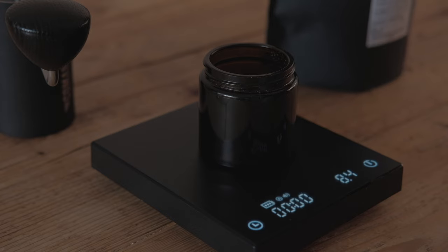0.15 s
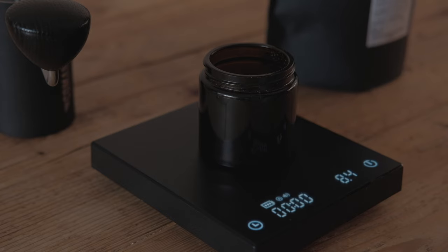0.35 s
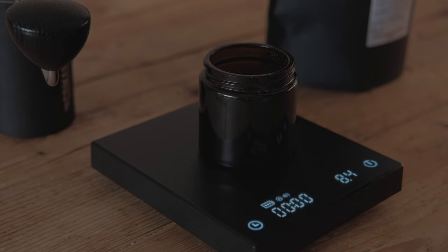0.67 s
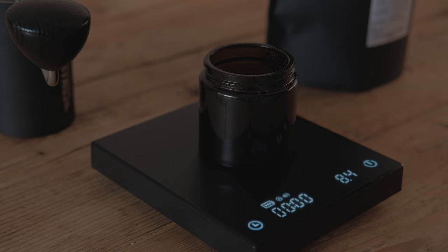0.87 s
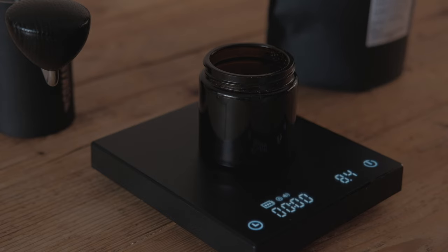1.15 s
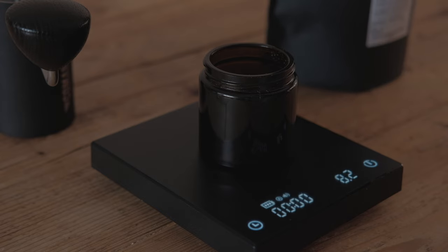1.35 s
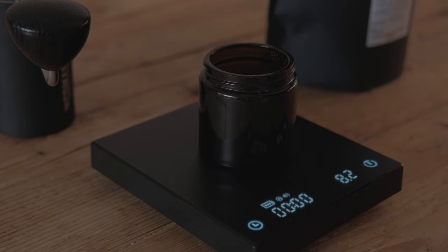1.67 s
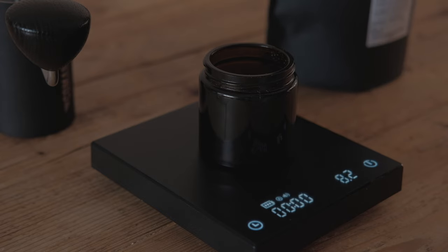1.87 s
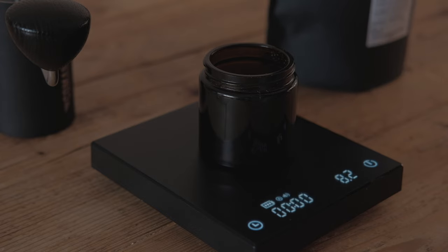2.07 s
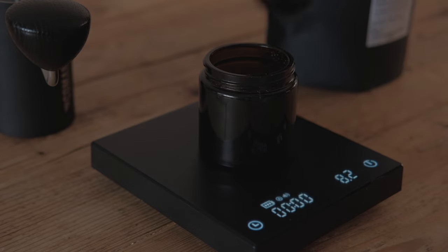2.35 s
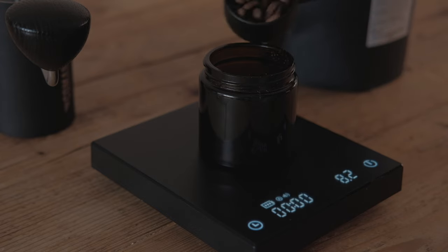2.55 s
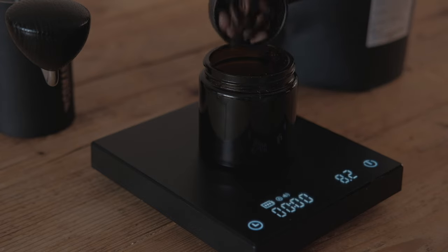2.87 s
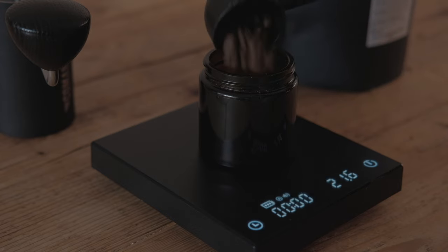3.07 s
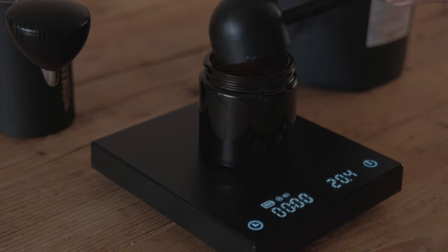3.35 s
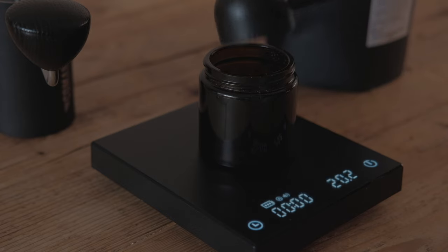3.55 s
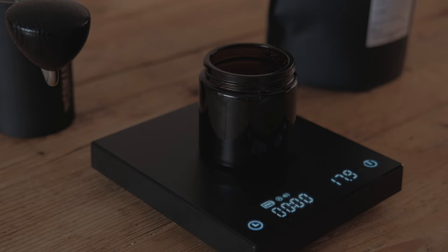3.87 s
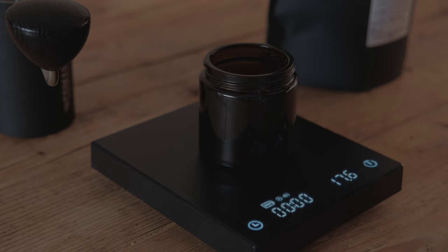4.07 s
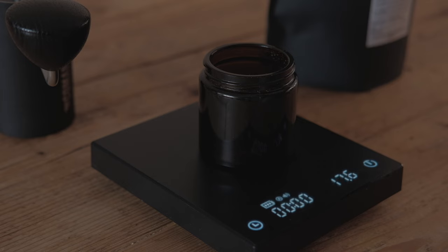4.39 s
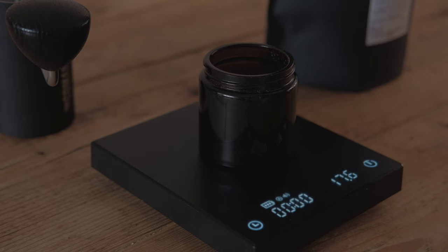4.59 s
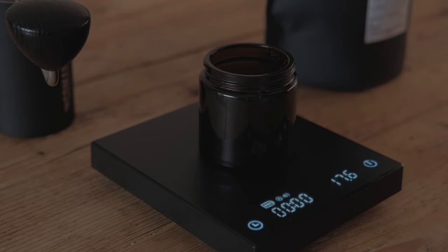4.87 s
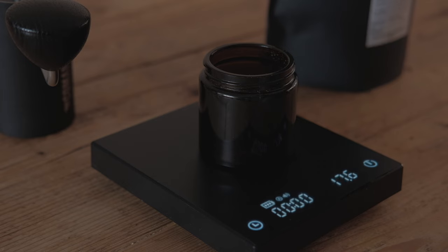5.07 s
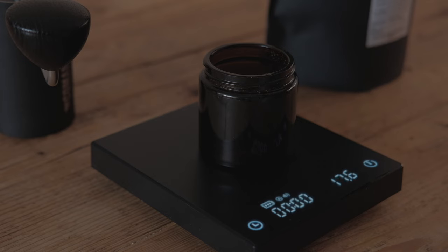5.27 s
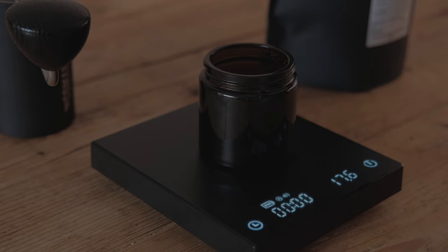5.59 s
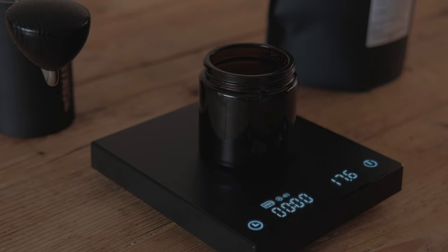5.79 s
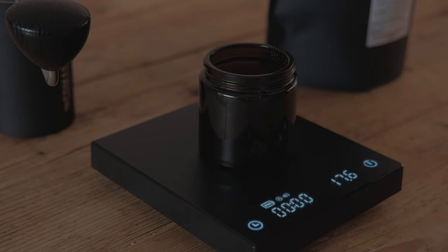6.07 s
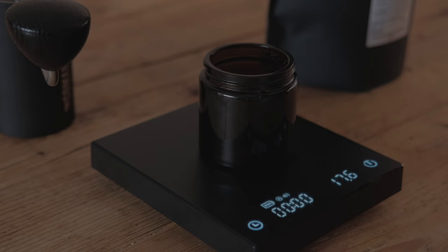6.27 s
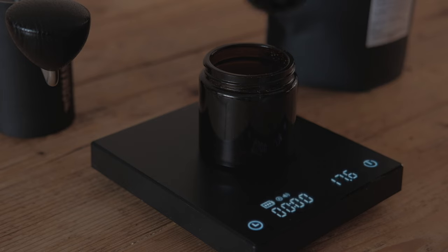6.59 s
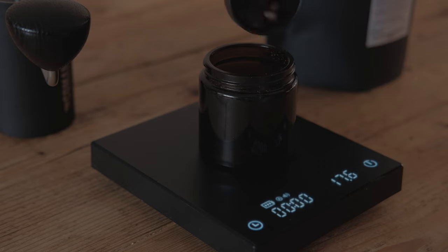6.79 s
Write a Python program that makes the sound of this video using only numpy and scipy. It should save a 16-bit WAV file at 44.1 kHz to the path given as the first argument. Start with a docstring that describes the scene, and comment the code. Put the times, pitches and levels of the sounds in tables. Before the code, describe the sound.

A quiet, moderately live kitchen, heard closely in stereo, with soft low-weighted air and a barely audible wavering hum throughout. From 0 to 0.65 s a scoop digs through coffee beans in a half-empty stiff bag: muffled granular grinding, rapid hollow knocks and bright crease snaps. Lighter scraping and bean ticks follow at 0.8-1.2 s, then knocks at about 1.37 and 1.53 s leave the scoop's bowl ringing briefly. Quiet until a single tap with a faint glass ping at 2.46 s. Beans trickle from 2.85 s, rush into the glass jar around 3.05-3.2 s with hard, dense clatter and high pings near 4.4 kHz, and thin out by 3.43 s. A calm pause. Weak scrapes begin at 4.4 s; a stronger crunchy, thumping dig runs 4.72-5.4 s. Tiny bean rattles come near 5.8, 6.25 and 6.65-6.85 s.

```python
"""In a small kitchen with a faint hum, coffee beans are scooped from a bag and tipped into a glass jar on a scale.
The scoop digs and knocks in the bag: filtered impulses and grainy noise excite the bag's hollow resonances.
It taps once, then pours: random contacts ring the air in the jar, and decaying sine pairs make the glass ring.
It digs again and is carried back with a few beans shifting in it, as coloured clusters of contacts.
Direct sound and exponentially dying reflections are added at both ears."""
import sys
import numpy as np
from scipy import signal
from scipy.fft import rfft, irfft
from scipy.io import wavfile
from scipy.ndimage import uniform_filter1d

SR = 44100
rng = np.random.default_rng(int(sys.argv[2]) if len(sys.argv) > 2 else 0)


def to_wav(sig):
    """Store sig (one row per channel, or 1-D mono) as 16-bit WAV at the path in sys.argv[1].

    Samples outside -1..1 are clipped; the rate is SR.
    """
    pcm = np.clip(np.atleast_2d(sig), -1, 1) * 32767
    pcm = np.round(pcm).astype(np.int16)
    wavfile.write(sys.argv[1], SR, pcm.T)  # frames by channels


N = 305613

# spectrum of the steady air of the kitchen: f/Hz, relative density level/dB per Hz
AIR_SPECTRUM = [(12, -55), (20, -21), (38, -14.5), (146, -6), (210, -4), (293, -2), (367, -8.5), (410, -6),
                (485, -8.5), (1190, -16.5), (1400, -19.5), (1530, -20.5), (1910, -22.5), (13900, -46),
                (16000, -53)]
# left-right likeness of the air: f/Hz, correlation/1
AIR_LIKENESS = [(60, 0.11), (180, 0.54), (550, 0.14), (1650, 0.063), (4970, 0.023), (15000, 0.087)]
# wavering hum of an appliance: mean f/Hz, level/dB
HUM_TONES = [(60, -87), (119, -76), (221, -70.5), (295, -71)]
AIR_DB = -53.5

# reverberation time of the kitchen: f/Hz, T60/s
ROOM_DECAY = [(150, 0.99), (500, 0.67), (1400, 0.93), (3700, 0.75), (10000, 0.41)]
# spectrum of the reflections: f/Hz, relative level/dB
ROOM_SPECTRUM = [(100, -4.5), (400, -3), (1000, 3.5), (2300, -3.5), (5000, -0.5), (12000, 0.5)]
# left-right likeness of the reflections: f/Hz, correlation/1
ROOM_LIKENESS = [(200, 0.9), (1000, 0.81), (2500, 0.45), (5000, 0.016), (12000, 0.17)]

# beans shift in the carried scoop: t/s, relative level/dB
SHIFTS_IN_SCOOP = [(0.018, -52), (1.315, -54), (5.751, -57), (5.793, -63.5), (5.846, -66.5), (6.225, -56.5),
                   (6.25, -63.5), (6.65, -63.5), (6.75, -66), (6.853, -63)]
SHIFT_WIDTH_S = 0.0085  # standard deviation of each cluster
# spectra of beans in the scoop, of the tapped scoop and of its ringing bowl: f/Hz, relative density level/dB per Hz
RATTLE_SPECTRUM = [(600, -22), (1600, -7), (2200, 4), (2700, -8), (4000, -21), (5200, -11.5), (6700, -24),
                   (8300, -22), (9500, -13.5), (11000, -28), (16000, -34)]
SCOOP_SPECTRUM = [(150, -25), (550, -14), (780, 1.5), (1100, -2.5), (1800, -4.5), (2200, 2), (2500, -2.5),
                  (2800, -16), (4000, -22.5), (4900, -20), (5500, -41), (6600, -26), (8500, -43),
                  (16000, -44)]
BOWL_SPECTRUM = [(1200, -26), (1900, -22), (2120, -0.5), (2330, 1.5), (2600, -10), (2900, -13), (4200, -19),
                 (4900, -10), (5600, -16), (6600, -14), (7100, -12), (8200, -25), (9900, -26), (16000, -62)]
TAP_S, TAP_DB = 2.4645, -27
# the bowl of the scoop rings on after a knock: t/s, ring level/dB, T60/s, crack level/dB
BOWL_KNOCKS = [(1.372, -38, 0.29, -47.5), (1.5328, -47.5, 0.34, -55)]

# creases of the bag snap: t/s, level/dB, lowest f/Hz
CREASE_SNAPS = [(0.288, -63, 3500), (0.322, -61, 5000), (0.342, -48, 3000), (0.4225, -43, 4500),
                (0.4363, -45, 2500), (0.4652, -40, 4500), (0.5362, -41, 5000), (0.6197, -47.5, 9000),
                (0.631, -60, 9000), (1.373, -38.5, 9000), (1.423, -58, 7000), (1.532, -43, 11400),
                (4.7357, -42, 3020), (4.894, -43, 3000), (4.908, -37, 3000), (4.972, -52, 8000),
                (5.001, -58, 8000), (5.069, -53, 3000), (5.1475, -54, 8000), (5.32, -65, 8000)]
# spectrum of a snap: f/Hz, relative density level/dB per Hz
CREASE_SPECTRUM = [(2500, 26), (5000, 1.5), (8500, 2), (11500, -2.5), (14000, -8), (16000, -19)]
# resonances of the bag: f/Hz, peak level over the plain sound/dB, T60/s
BAG_RESONANCES = [(336, -13, 0.1), (396.6, -6.5, 0.1), (738, -4.5, 0.064), (828, -4.5, 0.055),
                  (962, -7, 0.14), (1128, -1, 0.049), (1350, -18, 0.057), (1688, -2.5, 0.073),
                  (1980, -6.5, 0.029)]

# strokes of the scoop through the beans, levels before the bag adds its resonances:
# start t/s, length/s, rumble level/dB, its loss over the stroke/dB, bag crackle level/dB, its loss/dB
DIGGING_STROKES = [(-0.02, 0.32, -43.5, -3, -56, 0.5), (0.81, 0.21, -54.5, 1.5, -51, 12),
                   (4.403, 0.19, -56, 3, -57, 5), (4.721, 0.33, -37, 5, -45, 9.5)]
STROKE_ATTACK_S, STROKE_RELEASE_DB_PER_S = 0.03, 45.5
# spectra of beans grinding in the bag and of knocks heard through it: f/Hz, relative density level/dB per Hz
CHURN_SPECTRUM = [(230, 3.5), (340, 11.5), (550, 6.5), (830, 7), (1100, 2.5), (1700, 2.5), (2300, -2),
                  (3000, -9.5), (3900, -13), (6500, -28), (16000, -17)]
BAG_SPECTRUM = [(60, -33), (130, 0.5), (230, 0), (340, 11), (800, 4.5), (1350, 1), (1800, -1), (2300, -1.5),
                (3000, -1.5), (3900, -8.5), (4900, -9), (6500, -13), (12500, -30.5), (16000, -37)]

# the scoop knocks in the bag, levels before the bag adds its resonances:
# t/s, force level/dB, thud on the table/dB, crunch of beans/dB, brightness/dB, decay constant/s,
# starting f of the hollow boom/Hz, boom/dB, top f of the crunch/Hz (thud, crunch and boom count over the force)
BAG_KNOCKS = [(0.1437, -27.5, -13.5, 1, 1, 0.0036, 562, -2.5, 3800),
              (0.292, -43, -0.5, 2, 3, 0.023, 350, -5, 2700), (0.34, -41.5, -12, 1, 1, .003, 347, -3, 3480),
              (0.379, -30.5, -21, -1, -3, 0.0036, 380, -14, 3360),
              (0.423, -34, -25, -3, 9, 0.0037, 382, -4, 3100),
              (0.434, -29, -16, 1.5, -4, 0.003, 342, -3, 3270),
              (0.4647, -35, -30, 3, 16, 0.0047, 630, 0, 3180),
              (0.472, -26, -29, -3.5, -18, 0.0056, 372, -6.5, 3100),
              (0.499, -31.5, -31, -2.5, -7, 0.012, 352, -5, 2720),
              (0.5357, -35.5, -35, 1, 1, 0.0027, 727, -3, 2950),
              (0.553, -42, -26, 4.5, 16, 0.0049, 664, -6, 2980),
              (0.6223, -38.5, -40.5, -3.5, 1, 0.0022, 420, -1, 2700),
              (0.8342, -40.5, 2.5, -2.5, -9, 0.011, 460, -9, 3200),
              (1.164, -39, -1, -1, 5.5, 0.009, 360, -7.5, 2750),
              (1.3585, -36, 2, 0.5, 3, 0.0043, 223, -13, 3030),
              (1.367, -36, -14, -6, 12.5, 0.0058, 400, -1.5, 3220),
              (1.5336, -34.5, -17, 0, 5, 0.0062, 715, -0.5, 2720),
              (4.414, -43.5, -5.5, -1, 0.5, 0.0072, 366, -3, 2680),
              (4.478, -40.5, 0.5, -2.5, -2, 0.019, 370, -3, 2600),
              (4.503, -44.5, 2, -8, -1, 0.015, 215, -18, 2600),
              (4.728, -46, -16, -3, 17.5, 0.016, 370, -8, 2710),
              (4.753, -36, -6.5, -1, 11.5, 0.0037, 930, -2.5, 2680),
              (4.8605, -35, -15, 2.5, 6, 0.0049, 845, -12, 2520),
              (4.873, -31.5, -7, 4.5, 9, 0.018, 600, -18, 2540),
              (4.892, -27.5, -13, -2, 6.5, 0.0094, 750, -3, 2440),
              (4.9072, -26, -21, 3.5, 7, 0.0069, 410, -4.5, 2650),
              (4.929, -36.5, -11, 1.5, 2, 0.0035, 396, -8, 2400),
              (4.9502, -37.5, -8, 4.5, 3, 0.0035, 745, -8, 2700),
              (5.001, -40.5, -6, 2, 4, 0.0058, 394, -6, 2400),
              (5.038, -44, -9, -1, -10, 0.0072, 403, -4, 2300),
              (5.099, -32.5, -17, -4, -3, 0.0027, 510, -4.5, 2500),
              (5.1338, -33, 2.5, -1.5, -6, 0.0033, 400, 1, 2500),
              (5.145, -35.5, 1, 2.5, -3, 0.0042, 458, 4, 2400),
              (5.228, -33, -12, -9, -33, 0.007, 464, -2.5, 2230),
              (5.267, -40.5, -12, -13, -25, 0.0061, 325, 1.5, 2300),
              (5.387, -40, -2, -2, -4, 0.0035, 412, -3, 2520)]
# body, crunch, rasp and crackle of a knock: base level over its force/dB
KNOCK_BAND_DB = [0.5, 0.5, -6.5, -19]
# how far rasp and crackle follow the brightness: share/1
BRIGHTNESS_SHARE = [0.49, 0.94]
# the air in the bag booms briefly; its pitch sags as the bag gives
HOLLOW_T60_S, HOLLOW_SAG_PER_S = 0.029, 6  # the sag is a share of the pitch
HOLLOW_LOW_HZ = 215  # below this the boom radiates little

# single beans click: t/s, relative level/dB
BEAN_CLICKS = [(0.816, -50.5), (0.858, -49.5), (0.907, -45), (0.9256, -44), (0.969, -52.5), (0.987, -53),
               (1.004, -56), (1.025, -67), (1.118, -65), (1.322, -44), (1.380, -34), (2.4707, -48.5),
               (2.499, -49), (2.8425, -53), (2.856, -50), (2.869, -53), (2.8872, -44), (2.89, -41.5),
               (2.898, -48), (2.908, -58), (2.916, -47), (2.927, -43.5), (2.943, -50), (2.952, -60),
               (2.962, -63), (2.97, -46), (2.9774, -45), (3.021, -42), (3.025, -42.5), (3.041, -49),
               (3.049, -51.5), (3.0725, -41), (3.083, -42.5), (3.089, -46), (3.096, -40), (3.102, -44),
               (3.113, -48.5), (3.1286, -42), (3.144, -50), (3.160, -43.5), (3.17, -50), (3.178, -48),
               (3.188, -52), (3.199, -48), (3.207, -43), (3.212, -53), (3.218, -49), (3.222, -46),
               (3.257, -51), (3.275, -53), (3.283, -60), (3.305, -55), (3.314, -59), (3.364, -69),
               (3.381, -66), (3.4331, -57), (5.075, -44.5)]
# spectra of a bean outside the jar and of one landing in it: f/Hz, relative density level/dB per Hz
LOOSE_SPECTRUM = [(400, -27), (1200, -2.5), (2200, 2.5), (2900, 3), (4000, -4.5), (4900, 7), (6200, -9.5),
                  (9500, -12), (13000, -18), (16000, -41)]
BEAN_SPECTRUM = [(300, -9), (600, 4), (1050, 11), (1650, 2.5), (2100, 5.5), (2850, 0), (3550, 5.5),
                 (4050, 1.5), (4900, 7.5), (6150, -3), (6900, 2.5), (7500, -2), (8400, 0.5), (9200, 0.5),
                 (11500, 1), (13000, -6), (14800, -7), (16000, -27)]
SNAP_LOOSE_DB, SNAP_JAR_DB = -9, -1  # bright snap over the low clack, outside and inside the jar
# the air in the jar rings under each bean: f/Hz, peak level over the plain click/dB, T60/s
JAR_AIR_MODES = [(820, 2.5, 0.018), (1050, -3, 0.024), (2170, 4, 0.023), (3600, 5, 0.017), (5280, 4, 0.017),
                 (6650, 0, 0.016), (8300, 4, 0.014)]
# the air's pitch climbs as the jar fills and differs with where a bean lands (shares of the pitch)
CAVITY_RISE_PER_S, CAVITY_SCATTER = 0.036, 0.03
# the stream trickles as the scoop tips, jumps when the heap slides, and dies as the scoop runs empty
POUR_START_S, POUR_FULL_S, POUR_EMPTY_S, POUR_END_S = 2.875, 3.075, 3.212, 3.42
POUR_DB, TRICKLE_UNDER_DB, POUR_ATTACK_S, POUR_FALL_DB_PER_S = -42, 5, 0.077, 145

# beans and scoop strike the glass: t/s, relative level/dB of the lowest, middle and two top modes,
# ring time of the lowest mode over its free ring/1
GLASS_STRIKES = [(2.4642, -40, -66, -80, 0.4), (2.928, -65, -43, -57, 1), (2.98, -65, -38, -58, 1),
                 (2.997, -28.5, -47, -45, 0.87), (3.082, -40.5, -45, -37, 1), (3.154, -32.5, -44, -52, 0.7),
                 (3.226, -39.5, -56, -38, 1), (3.245, -34, -58, -49, 0.58), (3.283, -35, -62, -39.5, 0.44),
                 (3.433, -46, -59, -62, 1.18)]
# modes of the glass: central f/Hz
GLASS_MODE_HZ = [4364, 9582, 11274, 13722]
# modes of the glass: free T60/s
GLASS_MODE_T60 = [0.31, 0.074, 0.081, 0.055]
# modes of the glass: level added to each strike/dB
GLASS_MODE_DB = [0, 2, -5, -3]
EDGE_HZ = 16200


def gain_of(db):
    """Level to amplitude: 20 dB are a factor of ten."""
    return 10 ** (np.asarray(db) / 20)


def evened(x):
    """Normalization: scales the effective (rms) value to 1."""
    return x / np.sqrt(np.mean(x ** 2) + 1e-20)


def read(points, hz):
    """Interpolation: reads a spectrum linearly on a logarithmic frequency axis."""
    f, value = np.transpose(points)
    return np.interp(np.log(hz + 1), np.log(f + 1), value)


def add(mix, s, sound):
    """Superposition: adds a sound to the mix, in place, from time s."""
    part = mix[..., max(round(s * SR), 0):][..., :sound.shape[-1]]
    part += sound[..., :part.shape[-1]]


def ring(x, response):
    """Linear system: convolves a sound with an impulse response."""
    return signal.oaconvolve(x, response)[:len(x)]


def struck(sound, db):
    """Energy of an impact: gives a short sound the energy of 20 ms at the level db."""
    return gain_of(db) * sound * np.sqrt(.02 * SR) / np.linalg.norm(sound)


def placed(x, right_db):
    """Interaural level difference: makes the right side louder by right_db."""
    return x * gain_of([[-right_db / 2], [right_db / 2]])


def pulse(colour, lo_hz=20, hi_hz=20000, size=2048, order=8):
    """Minimum phase: the causal response of unit energy with a given spectrum, kept to one band."""
    hz = abs(np.fft.fftfreq(size, 1 / SR)) + 1
    band = np.sqrt((1 + (lo_hz / hz) ** 8) * (1 + (hz / hi_hz) ** order))
    gain = gain_of(read(colour, hz)) / band
    log_gain = np.log(np.maximum(gain / gain.max(), 1e-5))
    # the Hilbert transform of the log gain supplies the phase
    spectrum = np.exp(np.conj(signal.hilbert(log_gain)))
    h = np.fft.ifft(spectrum).real[:size // 2]
    return h / np.linalg.norm(h)


def resonant_response(modes, size, shifts):
    """Modal superposition: the direct impulse plus decaying cosines, each with its pitch shifted by a factor."""
    t = np.arange(size) / SR
    response = (t == 0).astype(float)
    for (hz, db, t60), shift in zip(modes, shifts):
        unit_peak = 2 * np.log(1000) / (t60 * SR)  # makes db the gain at resonance
        response += gain_of(db - 60 * t / t60) * np.cos(2 * np.pi * hz * shift * t) * unit_peak
    return response


def grains(per_s, spread_db):
    """Shot noise: random contacts of uneven force and either sign, rms 1."""
    size = gain_of(spread_db * np.minimum(rng.exponential(1, N), 3))
    return evened(size * rng.choice([-1, 1], N) * (rng.random(N) < per_s / SR))


def contact(chatter_s, apart, size=512):
    """Chatter of an impact: a decaying noise burst, thrown a little differently to each side."""
    common, side = rng.standard_normal((2, size)) * np.exp(-np.arange(size) / SR / chatter_s)
    return np.array([common + apart * side, common - apart * side])


def pair(noise, same, colour):
    """Interaural coherence: colours two unrelated noises and makes them partly alike."""
    hz = np.fft.rfftfreq(noise.shape[1], 1 / SR)
    a, b = rfft(noise)
    c = np.clip(read(same, hz), -1, 1)
    sides = np.array([a, c * a + np.sqrt(1 - c ** 2) * b])
    return irfft(sides * gain_of(read(colour, hz)), noise.shape[1])


def kitchen(waver_hz=3):
    """Stationary noise and tones: steady room air and the slightly wavering hum of an appliance."""
    air = gain_of(AIR_DB) * evened(pair(rng.standard_normal((2, N)), AIR_LIKENESS, AIR_SPECTRUM))
    hum = np.zeros(N)
    for hz, db in HUM_TONES:
        drift = waver_hz * evened(uniform_filter1d(rng.standard_normal(N), size=4000))
        phase = 2 * np.pi * np.cumsum(hz + drift) / SR
        hum += gain_of(db) * np.sqrt(2) * np.sin(phase)
    return placed(air + hum, right_db=1.5)


def room(x, first_s=0.00605, early=3.56, early_s=0.0082):
    """Reverberation: dense reflections, strongest from the table and near walls, each band dying at its own speed."""
    taps = rng.choice([-1., 1.], (2, SR)) * (rng.random((2, SR)) < .15)
    hz, t, z = signal.stft(pair(taps, ROOM_LIKENESS, ROOM_SPECTRUM), SR, nperseg=256)
    decay = gain_of(-60 * t / read(ROOM_DECAY, hz)[:, None])
    tail = signal.istft(z * decay, SR)[1]
    t = np.arange(tail.shape[1]) / SR
    tail = tail * (t > first_s) * (1 + early * np.exp(-t / early_s))
    return signal.fftconvolve(x[None], tail / np.linalg.norm(tail[0]), axes=1)[:, :N]


def shifting():
    """Forced resonance: little clusters of contacts ring the bowl of the scoop."""
    t = np.arange(N) / SR
    level = sum(gain_of(db) * np.exp(-.5 * ((t - s) / SHIFT_WIDTH_S) ** 2) for s, db in SHIFTS_IN_SCOOP)
    return level * ring(grains(per_s=600, spread_db=1.0), pulse(RATTLE_SPECTRUM)) * gain_of(1.0)


def tap():
    """Damped impact: the full scoop knocks once, and the beans in it damp its ring at once."""
    out = np.zeros(N)
    add(out, TAP_S, struck(pulse(SCOOP_SPECTRUM), TAP_DB))
    return out


def bowl(jump_s=0.0026):
    """Free decay: beans jump with a bright crack, and the clustered resonances of the bowl die away."""
    out, t = np.zeros(N), np.arange(SR // 2) / SR
    crack_response = pulse(BEAN_SPECTRUM, 11000, 18000)
    for s, db, t60, crack_db in BOWL_KNOCKS:
        noise = rng.standard_normal(len(t))
        add(out, s, gain_of(db - 60 * t / t60) * evened(ring(noise, pulse(BOWL_SPECTRUM))))
        add(out, s, struck(ring(noise * np.exp(-t / jump_s), crack_response), crack_db))
    return out


def snaps(chatter_s=0.0012, apart=0.62):
    """Snap-through: creases of the stiff bag flip over with a very short, bright burst."""
    out = np.zeros((2, N))
    for s, db, low_hz in CREASE_SNAPS:
        crease = pulse(CREASE_SPECTRUM, low_hz)
        add(out, s, struck(signal.fftconvolve(contact(chatter_s, apart), crease[None]), db))
    return out


def in_bag(x, through_db=-1.44):
    """Cavity resonance: the half-empty bag adds its hollow modes to the sound inside it."""
    response = resonant_response(BAG_RESONANCES, 8192, np.ones(len(BAG_RESONANCES)))
    return gain_of(through_db) * ring(x, response)


def stroke(start, length, sag_db):
    """Envelope of friction: a quick attack, a hold that sags or swells, then the beans settle."""
    t = np.arange(N) / SR - start
    fade_db = sag_db * np.clip(t / length, 0, 1) + STROKE_RELEASE_DB_PER_S * np.maximum(t - length, 0)
    return np.clip(t / STROKE_ATTACK_S, 0, 1) * gain_of(-fade_db)


def digging(clump_db=2.5, crackle_clump_db=3, crisp_db=-9):
    """Granular friction: beans grind past the scoop in slips, some crisp; the bag muffles them and crackles."""
    slips = uniform_filter1d(rng.standard_normal(N), size=600)
    slips = evened(uniform_filter1d(slips, size=300))
    grind = evened(ring(grains(per_s=800, spread_db=1.5), pulse(CHURN_SPECTRUM, 243, 5300)))
    ticks = evened(ring(grains(per_s=200, spread_db=-1.0), pulse(CHURN_SPECTRUM, 2100, 4300)))
    rumble = evened(gain_of(clump_db * slips) * (grind + gain_of(crisp_db) * ticks))
    crackle = ring(grains(per_s=2000, spread_db=2.5), pulse(BAG_SPECTRUM, 2620, 21000))
    crackle = evened(gain_of(crackle_clump_db * slips) * crackle)
    out = np.zeros(N)
    for s, length, rumble_db, rumble_sag_db, crackle_db, crackle_sag_db in DIGGING_STROKES:
        out += gain_of(rumble_db) * rumble * stroke(s, length, rumble_sag_db)
        out += gain_of(crackle_db) * crackle * stroke(s, length, crackle_sag_db)
    return out


def knocks(crunch=0.14, crunch_rise_db=3, thud_slow=2.9, build=0.07, grain_db=2.5):
    """Impulse excitation: each knock is a push, a hollow boom of the bag and a quick, grainy crunch of beans."""
    out, t = np.zeros(N), np.arange(4096) / SR
    low_cut = signal.butter(4, HOLLOW_LOW_HZ, "high", fs=SR, output="sos")
    for s, force_db, thud_db, crunch_db, bright_db, length, hollow_hz, hollow_db, top_hz in BAG_KNOCKS:
        # bands of thud, body, crunch, rasp and crackle lie between these edges (Hz)
        edges = [140, 280, 1100, top_hz, 7000, 12500]
        clumps = gain_of(grain_db * evened(uniform_filter1d(rng.standard_normal(len(t)), size=50)))
        noise = crunch * evened(clumps * rng.standard_normal(len(t)))
        noise *= 1 - np.exp(-t / (build * length))
        band_offsets = [0, crunch_db, *np.multiply(BRIGHTNESS_SHARE, bright_db)]
        levels = [thud_db, *np.add(KNOCK_BAND_DB, band_offsets)]
        for k, db in enumerate(levels):
            slowness = 1 if k else thud_slow
            dying = np.exp(-t / (max(length, 1e-3) * slowness))
            # the share of grainy noise beside the sharp push rises from band to band
            push = (t == 0) + gain_of(k * crunch_rise_db) * noise * dying
            response = pulse(BAG_SPECTRUM, edges[k], edges[k + 1], order=6)
            add(out, s, struck(ring(push, response), force_db + db))
        phase = 2 * np.pi * np.cumsum(hollow_hz * np.exp(-HOLLOW_SAG_PER_S * t)) / SR
        boom = np.sin(phase) * gain_of(-60 * t / HOLLOW_T60_S)
        add(out, s, struck(signal.sosfilt(low_cut, boom), force_db + hollow_db))
    return out


def in_jar(response, s):
    """Cavity resonance: adds the ring of the air in the jar, as full as it is at time s, to a response."""
    rise = CAVITY_RISE_PER_S * (s - POUR_FULL_S)
    shifts = 1 + rise + CAVITY_SCATTER * rng.standard_normal(len(JAR_AIR_MODES))
    return signal.fftconvolve(response, resonant_response(JAR_AIR_MODES, 1024, shifts))


def clicks(chatter_s=0.0016, apart=0.26, level_db=1.0):
    """Hard impact: a bean chatters for a millisecond or two; during the pour it also rings the air in the jar."""
    out = np.zeros((2, N))
    # low clack and bright snap
    loose = pulse(LOOSE_SPECTRUM, 300, 6000), pulse(LOOSE_SPECTRUM, 6000, 18000)
    jarred = pulse(BEAN_SPECTRUM, 300, 6000), pulse(BEAN_SPECTRUM, 6000, 18000)
    for s, db in BEAN_CLICKS:
        force = contact(chatter_s, apart)
        if 2.92 < s < 3.3:  # landing in the jar
            clack, snap = [in_jar(part, s) for part in jarred]
            snap_db = SNAP_JAR_DB
        else:
            clack, snap = loose
            snap_db = SNAP_LOOSE_DB
        add(out, s, struck(signal.fftconvolve(force, clack[None]), db + level_db))
        add(out, s, struck(signal.fftconvolve(force, snap[None]), db + level_db + snap_db))
    return out


def flow(t):
    """Granular flow: gain of the stream at time t, a trickle, the slide of the heap, the last stragglers."""
    trickle_db = TRICKLE_UNDER_DB * (t < POUR_FULL_S)
    fade_db = trickle_db + POUR_FALL_DB_PER_S * np.maximum(t - POUR_EMPTY_S, 0)
    return np.clip((t - POUR_START_S) / POUR_ATTACK_S, 0, 1) * gain_of(POUR_DB - fade_db)


def pour(per_s=300, spread_db=1.0, chatter_s=0.0011, apart=0.17):
    """Poisson process: a stream of beans lands on the heap in the jar, one separate tick after another."""
    out, bean = np.zeros((2, N)), pulse(BEAN_SPECTRUM)
    waits, forces = -np.log(rng.random((2000, 2))).T  # exponentially distributed
    for s, force in zip(POUR_START_S + np.cumsum(waits / per_s), forces):
        if s > POUR_END_S:
            break
        tick = signal.fftconvolve(contact(chatter_s, apart), in_jar(bean, s)[None])
        tick *= np.sqrt(SR / per_s) / np.linalg.norm(tick)
        add(out, s, flow(s) * gain_of(spread_db * min(force, 2)) * tick)
    return out


def jar(split_hz=8, twin=0.2, detune_hz=4, patter_db=-8, choke_s=0.011):
    """Split modes: the glass rings in close pairs; each strike chokes the last ring and restarts it, detuned."""
    out, t = np.zeros(N), np.arange(SR) / SR
    patter = grains(per_s=230, spread_db=2.5) * flow(np.arange(N) / SR)
    gaps = np.diff([row[0] for row in GLASS_STRIKES], append=N / SR)
    for k, (hz, mode_db, t60) in enumerate(zip(GLASS_MODE_HZ, GLASS_MODE_DB, GLASS_MODE_T60)):
        for (s, *levels, free), gap in zip(GLASS_STRIKES, gaps):
            dying = gain_of(-60 * t / (t60 * (free if k == 0 else 1)))
            choke = np.exp(-np.maximum(t - gap, 0) / choke_s)
            a, b = rng.uniform(0, 2 * np.pi, 2)
            pitch = hz + detune_hz * rng.uniform(-1, 1)
            wave = np.sin(2 * np.pi * pitch * t + a)
            wave += twin * np.sin(2 * np.pi * (pitch - split_hz) * t + b)
            add(out, s, gain_of(levels[min(k, 2)] + mode_db) * dying * choke * wave)
        # the light patter of the stream keeps the lowest mode shimmering between the strikes
        if k == 0:
            mode = gain_of(-60 * t / t60) * np.sin(2 * np.pi * hz * t)
            out += gain_of(patter_db) * ring(patter, mode / np.linalg.norm(mode))
    return out


def scene():
    """Direct and reverberant field: bag and jar stand a little to the right, in the same room."""
    bumps = in_bag(knocks())
    churn = in_bag(digging()) + bowl() + shifting()
    beans, creases, glass, knock = clicks() + pour(), snaps(), jar(), tap()
    send = gain_of(-4.5) * (bumps + beans.mean(0) + glass)
    send += gain_of(-2.5) * (churn + creases.mean(0)) + gain_of(-9.0) * knock
    direct = placed(bumps + churn + knock, right_db=3.0)
    direct = direct + placed(beans + creases, right_db=0.8) + placed(glass, right_db=4.0)
    return direct + placed(room(send), right_db=1.4) + kitchen()


def record(dry):
    """Band limitation: a linear-phase low-pass removes what lies above EDGE_HZ."""
    low_pass = signal.firwin(401, EDGE_HZ, window=("kaiser", 9), fs=SR)
    return signal.oaconvolve(dry, low_pass[None], "same")


dry = scene()
out = record(dry)
to_wav(out)
```